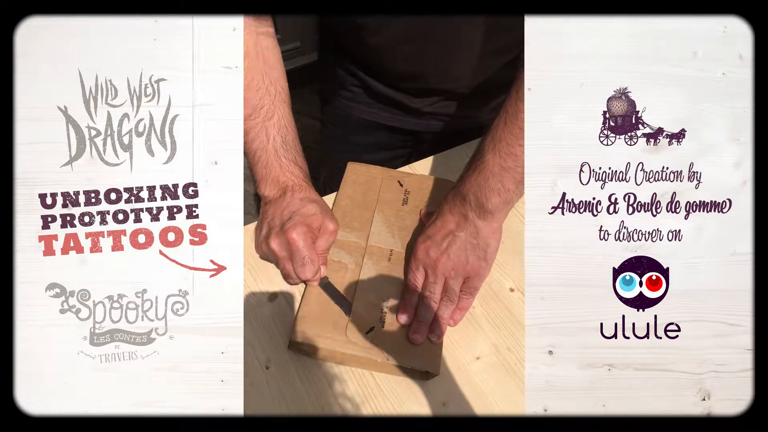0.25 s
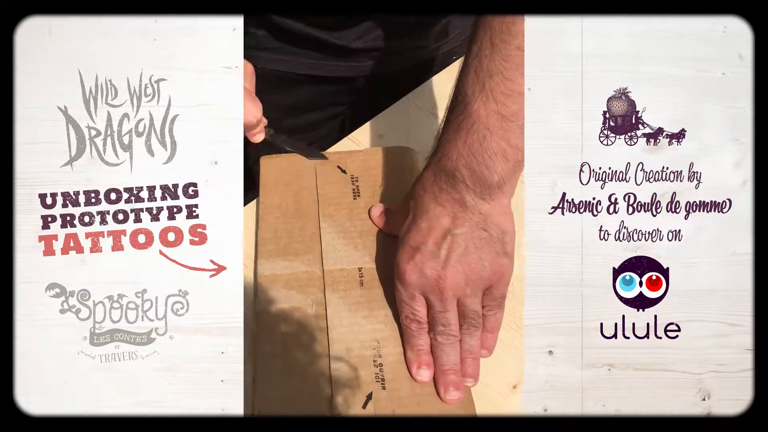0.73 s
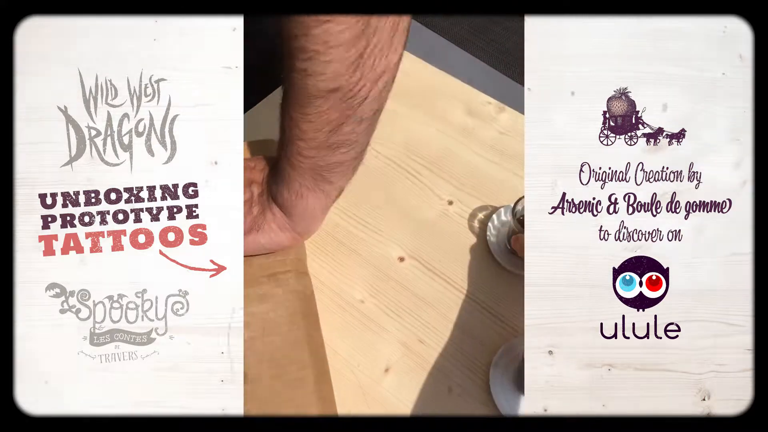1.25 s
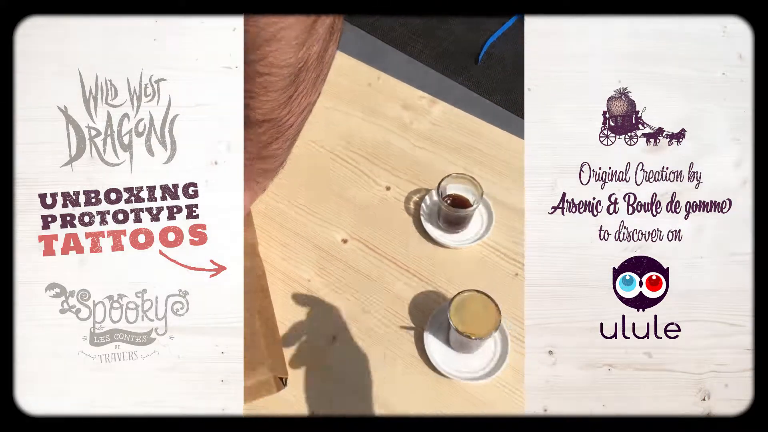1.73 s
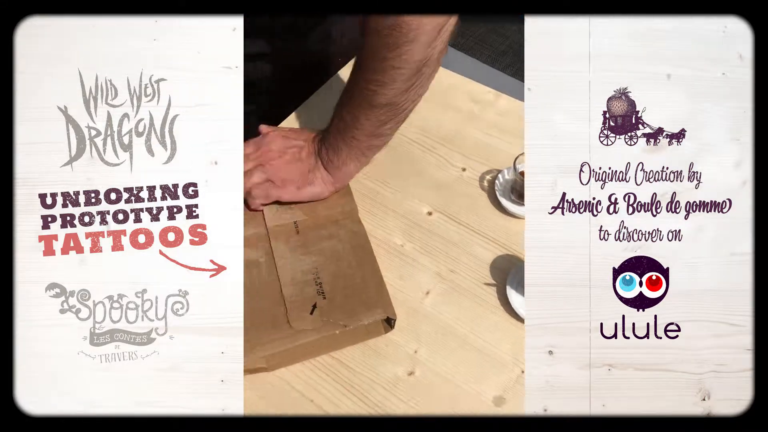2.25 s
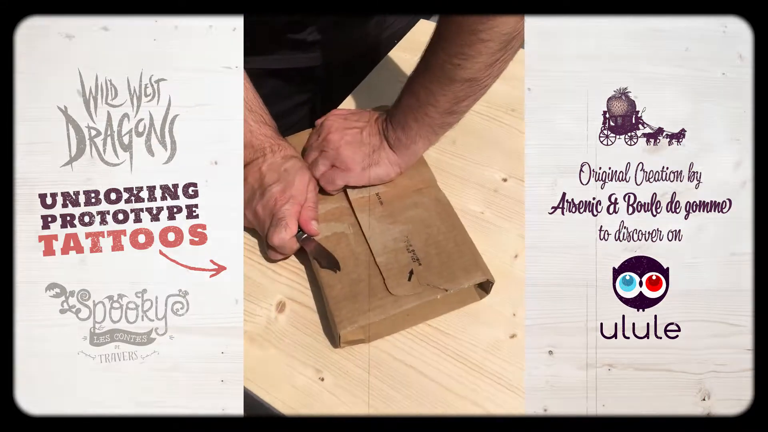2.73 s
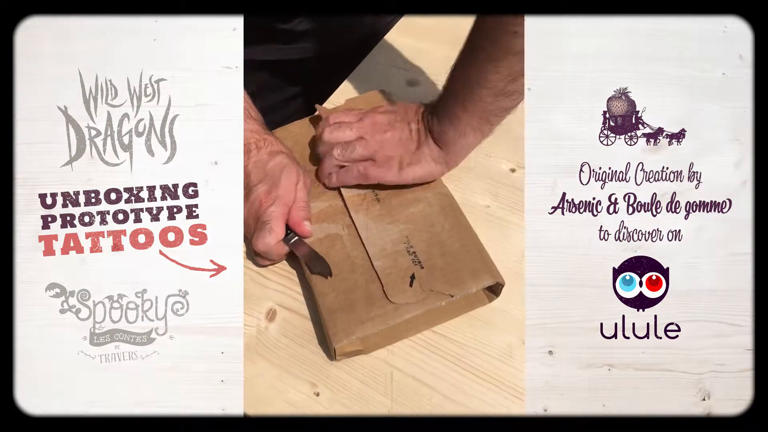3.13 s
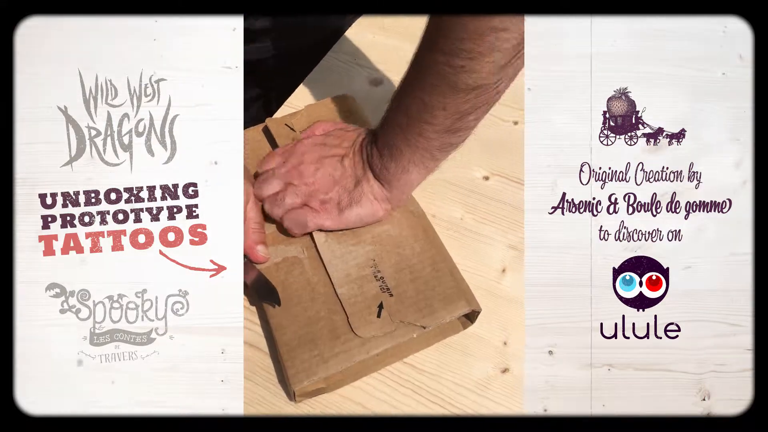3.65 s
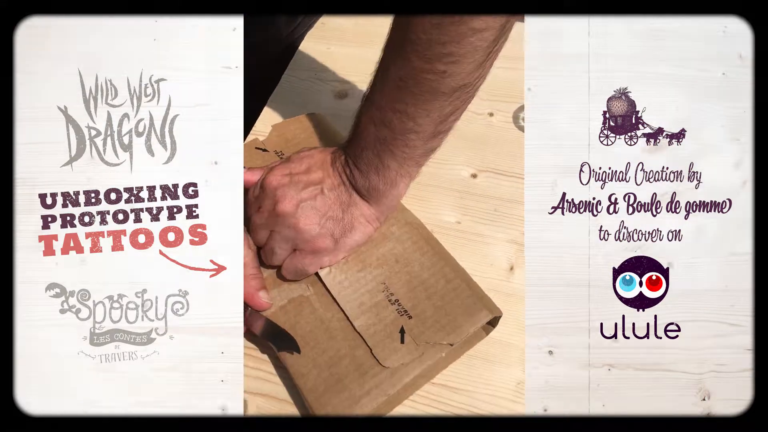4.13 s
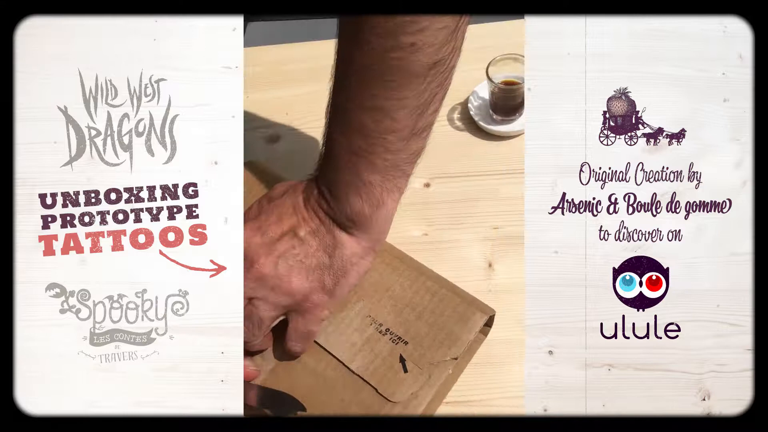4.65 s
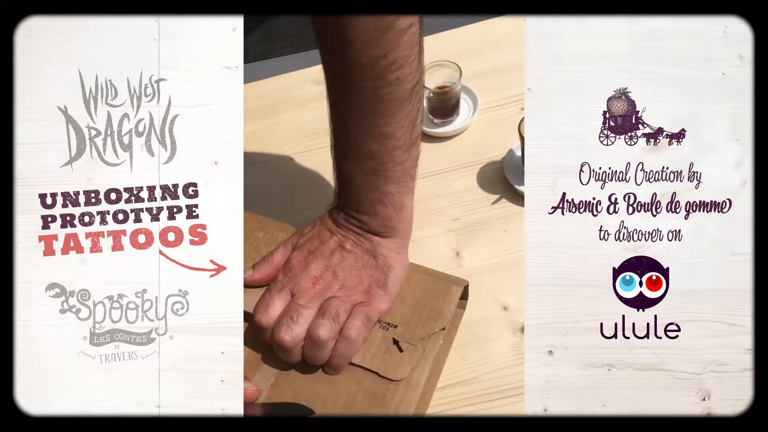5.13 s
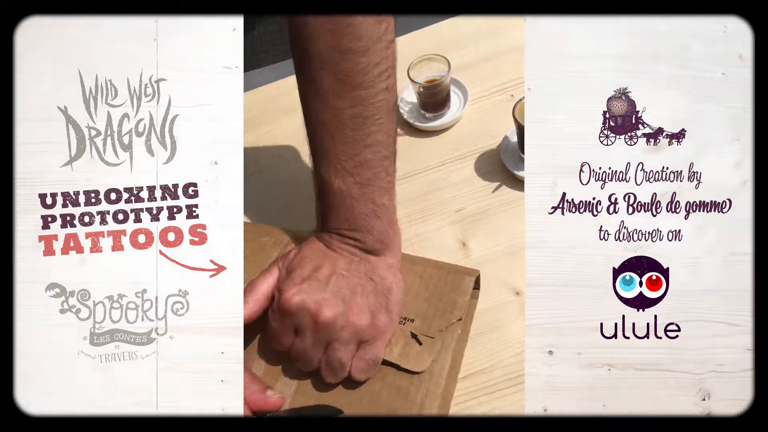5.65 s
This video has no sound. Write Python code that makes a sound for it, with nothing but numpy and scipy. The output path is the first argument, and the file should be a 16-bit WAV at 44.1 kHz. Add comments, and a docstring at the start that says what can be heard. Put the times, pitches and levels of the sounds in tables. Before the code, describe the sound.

Hands and a knife blade slide over a cardboard mailer on a wooden table, with soft papery strokes and faint ticks. The knife knocks down once with a brief metallic clink. Quiet rubbing follows, then hard snaps near three and four seconds, and a dense ripping crackle at the end. Close microphone, small dull reflections, low quiet room hum.

```python
"""Tearing open a cardboard mailer

Hands work a knife under the flap of a cardboard mailer on a wooden table and tear it open.
Palms and blade slide on the card: coloured friction noise. Fibres and glue snap: dying sprays of noise
through resonances. The packet bumps the table and the knife is dropped once: decaying sines.
Some scrapes sound hollow, the hits return a short dull wash, and a quiet room hums below."""
import sys
import numpy as np
from scipy import signal
from scipy.io import wavfile
from scipy.ndimage import uniform_filter1d

SR = 44100
rng = np.random.default_rng(int(sys.argv[2]) if len(sys.argv) > 2 else 0)


def put_to_file(sound):
    """Save the sound as 16-bit audio at rate SR, in the file named by the first command-line argument."""
    columns = np.atleast_2d(sound).T  # one column per channel
    safe = np.clip(columns, -1, 1)
    whole_steps = np.round(safe * 32767)
    wavfile.write(sys.argv[1], SR, whole_steps.astype(np.int16))


N = 259440

# Spectrum of the room: (frequency [Hz], relative level per Hz [dB])
ROOM_SPECTRUM = [(20, -35), (42, -0.5), (80, 0.5), (130, -5), (250, -9.5), (500, -17.5), (1100, -18.5),
                 (3500, -23.5), (12800, -30), (16500, -46)]
# Palms and blade rubbing the card, one row a stroke: (loudest moment [s], swell [ms], fade [ms],
# drop at both ends [dB], hiss [dB], extra sheen of the hiss [dB], drumming of the sheet [dB])
RUBBING_STROKES = [(0.089, 72, 133, -7, -52, -1.5, -56), (0.32, 76, 187, -6, -40.5, -1, -50),
                   (0.565, 25, 14.5, -5, -47.5, 7, -53), (0.609, 24.3, 36.4, -6.5, -44, 4, -52),
                   (0.701, 26.7, 21, -7, -47, 3, -56.5), (0.798, 76, 58, -6, -46.5, 1.5, -50.5),
                   (0.955, 53, 28, -12, -44, -4, -48.5), (1.022, 16, 12, -6, -50, -8, -68),
                   (1.171, 10, 48, -18, -41, -6, -46.5), (1.27, 39, 40, -4.5, -60, -0.5, -66),
                   (1.431, 96, 53, -6.5, -46, 0, -54), (1.548, 35, 38, -4, -55, -0.5, -53.5),
                   (1.615, 15, 28, -3, -57, 0, -55), (1.765, 125, 139, -8, -48, -2.5, -46),
                   (1.95, 65, 60, -5, -54.5, -0.5, -53), (2.079, 102, 160, -10, -45.5, -3, -48),
                   (2.34, 58, 193, -6, -49, 3, -50.5), (2.70, 190, 119, -7, -45.5, -0.5, -51),
                   (2.876, 52, 68, -6, -45.5, 0.5, -51), (2.989, 39.7, 78, -4.5, -52, -5, -53),
                   (3.12, 36, 69, -5, -41.5, 0, -51.5), (3.207, 20.8, 26, -10, -36, 4.5, -35),
                   (3.253, 18, 58, -11, -38.5, -1, -45), (3.36, 40, 32, -3.5, -61, 2, -60),
                   (3.453, 40.4, 51, -8.5, -43, -0.5, -49.5), (3.54, 30, 25, -4, -46, 3, -45),
                   (3.572, 12, 45, -10, -44, 2, -40), (3.70, 62, 94, -5.5, -43.5, 1, -45.5),
                   (3.85, 41, 48, -3.5, -49, 0, -58), (3.95, 51, 98, -3, -50, -1, -50.5),
                   (4.072, 12.7, 35.7, -10, -25, -7, -27.5), (4.118, 30, 32, -6, -31, -1.5, -39),
                   (4.189, 28.7, 83, -4.5, -57.5, -10, -55), (4.35, 47, 55, -6.5, -49, -1, -53.5),
                   (4.43, 36, 71, -5, -55.5, -0.5, -56), (4.53, 25.3, 90, -6.5, -52, -1, -53),
                   (4.629, 16.4, 57, -13.5, -40, -4, -42.5), (4.759, 34.5, 50, -5, -45, -3.5, -54),
                   (4.90, 79, 75, -6, -43, 3, -52), (5.13, 39, 90, -4.5, -48.5, 2, -48.5),
                   (5.248, 45, 25, -14, -36, -9, -32), (5.328, 18, 33, -7, -47, 8, -37),
                   (5.29, 21.3, 19.7, -3, -47, 4, -41), (5.499, 136, 62.5, -6, -37, -3, -46.5),
                   (5.599, 46, 53.4, -8.5, -27.5, 0, -33), (5.719, 67, 122, -4.5, -38, 1, -41.5),
                   (5.859, 23.5, 36, -4.5, -34, -6, -40.5)]
# Spectrum of the friction hiss: (frequency [Hz], relative level per Hz [dB])
HISS_SPECTRUM = [(1900, -45), (3100, -4), (4780, -4.5), (5840, 3), (7770, -2), (8620, 0), (14900, 7),
                 (16100, 6.5), (16500, -45)]
# Spectrum of the rumble under the drumming: (frequency [Hz], relative level per Hz [dB])
RUMBLE_SPECTRUM = [(59, -52), (100, -14), (291, 2), (501, -10), (590, -10), (700, -5.5), (910, -44),
                   (1540, -120)]
# Broad modes of the cardboard: (frequency [Hz], width [Hz], level [dB])
SHEET_MODES = [(887, 250, 0), (1305, 335, 2.5), (1550, 380, 4), (2380, 950, -5.5), (2693, 150, 6),
               (3110, 4000, -3.5)]
# Fibres and glue letting go:
# (time [s], crack peak [dB], crack pitch [Hz], sheet knock [dB], bright spit [dB])
FIBRE_SNAPS = [(0.082,-35.5,2050,-46,-46), (0.146,-38,1790,-57,-54), (0.1625,-32,2028,-53,-52),
               (0.175,-27.5,2580,-42,-41), (0.5404,-38,1530,-45,-39), (0.558,-30,4530,-58,-35),
               (0.565,-31,4600,-57,-26), (0.586,-39,6900,-44,-30), (0.6297,-43,5980,-59,-46),
               (0.6874,-47,1570,-59,-49), (0.73,-40,1503,-50,-41), (0.834,-36,1786,-43,-50),
               (0.8917,-35,2280,-45,-44), (0.9304,-36,1576,-42,-52), (0.9622,-26,1970,-32.5,-27),
               (0.9655,-23,6300,-32,-26), (1.0144,-54,1800,-46,-41), (1.0226,-40,1816,-42,-38),
               (1.1612,-14,2217,-19,-37), (1.4288,-41,1506,-35,-36), (1.6098,-48,1730,-37.5,-56),
               (1.905,-13.5,7400,-56,-26.5), (1.9107,-33,2650,-53,-59), (1.9924,-33,1948,-46,-50),
               (2.0317,-31,1825,-48.5,-49), (2.052,-30,3660,-45,-51), (2.0857,-27.5,4745,-49,-52),
               (2.1018,-23,2018,-40,-40), (2.1107,-34,6920,-46,-46), (2.2815,-39,2063,-47,-58),
               (2.3129,-25.5,1750,-39,-40), (2.3537,-23.5,1838,-47,-47), (2.7679,-30.5,1654,-44,-44),
               (2.8504,-31,3430,-62,-40), (2.9743,-35,1593,-55,-53), (3.1645,-5.5,5000,-35,-27),
               (3.1963,-1.5,2172,-17.5,-14), (3.2053,-11,2898,-35,-15), (3.2388,-5,3044,-25,-18.5),
               (3.2458,-23,1825,-31,-37), (3.2585,-23,3060,-22.5,-26), (3.5512,-24,2280,-43,-29),
               (3.5646,-22.5,2190,-37,-40), (3.5722,-19,2195,-30,-35), (3.7466,-29,2444,-49,-35),
               (3.8423,-30,5408,-55,-44), (3.9796,-27.5,3412,-57,-39), (4.0396,-35,1506,-29.5,-46),
               (4.0542,-10,2245,-31,-15), (4.063,-13,2488,-18,-19), (4.066,-2.5,2540,-11,-17),
               (4.0729,-7,2730,-12,-16), (4.0784,-26,1640,-27,-25), (4.0949,-9.5,6116,-28,-23),
               (4.1015,-17,2750,-26,-28), (4.1111,-11,6080,-24,-19), (4.1135,-13,2985,-32,-25),
               (4.1237,-17,5690,-30,-22), (4.1432,-18.5,6900,-46,-35), (4.1485,-15,6474,-42,-31),
               (4.5036,-13,2395,-31.5,-23), (4.5398,-45.5,1658,-56,-41.5), (4.5682,-30,6336,-52,-37),
               (4.6154,-17,6006,-41.5,-25), (4.6202,-5.5,2980,-36,-16.5), (4.6469,-10,2565,-25.5,-24),
               (4.7733,-28,1525,-42,-32), (5.2352,-38,2093,-39,-34), (5.242,-24,2266,-20,-26),
               (5.2491,-15,2420,-22,-22), (5.4162,-34,2171,-37,-39), (5.4307,-25,2660,-40,-35),
               (5.446,-13,2734,-32.5,-18), (5.4791,-26.5,3333,-49,-37), (5.5219,-24,6100,-46,-44),
               (5.5284,-20.5,3670,-43,-28), (5.5505,-18,6170,-40,-22), (5.5558,-10.5,3590,-34,-22),
               (5.5665,-10,3376,-20,-11), (5.5735,-10.5,3110,-30,-26), (5.583,-15,2874,-22,-27),
               (5.5851,-14,2835,-37,-17), (5.5917,-7,3142,-31,-16.5), (5.6122,-27,2232,-28,-26),
               (5.6165,-19,3370,-21,-14.5), (5.6288,-13.5,3000,-23,-14.5), (5.6333,-21.5,1960,-19,-31.5),
               (5.642,-34,2388,-30,-27), (5.6504,-35,2494,-41,-25.5), (5.669,-15,4585,-33,-18),
               (5.6782,-23,3893,-26,-19), (5.6973,-21,4590,-40,-25), (5.7053,-18,4573,-43,-30),
               (5.7172,-21,3787,-38,-31), (5.7342,-16,2154,-28.5,-24), (5.7566,-17.5,2857,-34,-25),
               (5.7715,-18,2810,-35,-21), (5.796,-18,1611,-22,-32), (5.8075,-21,2140,-27,-24),
               (5.8184,-21,2097,-28,-33), (5.827,-20,2132,-23,-33), (5.8526,-9,2580,-15.5,-21),
               (5.8646,-17,3490,-25,-16.5)]
# Spectrum of the bright spit of a snap: (frequency [Hz], relative level per Hz [dB])
SPIT_SPECTRUM = [(3530, -15.5), (6000, -3), (10400, -5), (11500, -1), (14800, -5.5), (16000, -8),
                 (16500, -31)]
# Hollow scrapes, when a rubbed flap sounds one broad note:
# (start [s], length [s], pitch [Hz], level [dB])
HOLLOW_SCRAPES = [(0.274, 0.14, 1590, -55), (3.509, 0.074, 2397, -42), (5.216, 0.056, 2450, -34.5),
                  (5.261, 0.086, 2196, -38.5), (5.461, 0.21, 1170, -45), (5.659, 0.085, 1150, -39)]
# Packet and hands bumping the table: (time [s], level [dB], pitch [Hz])
TABLE_BUMPS = [(0.548, -44, 154.8), (0.586, -35, 154), (0.773, -38, 143), (0.899, -37, 295),
               (0.961, -25.5, 310), (1.16, -25.5, 342), (1.165, -29, 147), (1.19, -34, 376),
               (1.205, -32.5, 215), (1.43, -16.5, 237.4), (1.544, -43, 296), (1.895, -36, 322.5),
               (2.022, -32.5, 324), (2.169, -35.5, 197.4), (2.306, -34.5, 106.7), (2.37, -39, 87.2),
               (2.959, -40, 62), (3.195, -19.5, 318), (3.234, -26, 272), (3.259, -21.5, 240),
               (3.65, -39, 199.6), (3.913, -37, 182.3), (4.065, -12.5, 372), (4.109, -29, 374),
               (4.502, -26, 245), (4.623, -27, 193.5), (4.654, -29, 85.2), (4.774, -30.5, 158.5),
               (4.798, -26.5, 141.2), (5.241, -21, 304), (5.563, -26.5, 257), (5.599, -30, 319.2),
               (5.725, -46.5, 258.6), (5.852, -15, 328)]
# The knife landing and bouncing: (time [s], level [dB])
KNIFE_LANDINGS = [(1.1615, -10.5), (1.169, -21)]
# Modes of the table top, then the blade: (frequency [Hz], level [dB], t60 [s])
KNIFE_MODES = [(1124, -3.5, 0.016), (2140, -2.5, 0.013), (5277, -3, 0.07), (9230, -11, 0.056),
               (9500, -5.5, 0.055), (11740, -27, 0.15), (13600, -29, .04), (15930, -14, .06)]

ROOM_DB = -57
RESTING_HISS_DB, RESTING_DRUM_DB = -74, -78  # hands shifting between strokes
ROUNDNESS = 1.3  # power of time by which a stroke's level drops
LIFT_DB_PER_MS = 1  # steeper fall once contact is lost
CRACKLE_SHARE = 0.25  # share of the friction power that is fibre clicks
PATCHY_DB, PATCHES_PER_S = 2.26, 4.1
SHEEN_HZ = 8740  # the sheen lies above this
DRUM_TOP_HZ = 3830  # the rubbed sheet drums below this
RUMBLE_UNDER_DRUM_DB = -6.5
DYING_MS = 17.95  # t60 of a snap whose knock equals its crack or spit
DULL_LINGERS_MS_PER_DB = 0.31  # a snap with more knock than crack or spit dies slower
FIRST_BREAK_DB, FIRST_BREAK_S = 6.5, 0.0006  # the first fibres to go stand out of the spray
CRACK_Q, BROAD_CRACK_DB = 4.4, -9  # sharpness of the pitch; the unpitched part beside it
SMALL_SNAPS_PER_S, MID_RUB_DB = 36, -46  # the rate holds at this hiss level
HARD_RUB_QUICKENS = 0.8  # dB of rate per dB of hiss
SMALL_SNAP_OVER_RUB_DB, SMALL_SNAP_SPREAD_DB = 1.5, 4.0
SMALL_CRACK_LOW_HZ, SMALL_CRACK_HIGH_HZ = 1810, 6800
SCRAPE_WIDTH_HZ = 370
BUMP_RING_S, BUMP_RING_CYCLES = 0.025, 6.0  # t60 = a fixed time plus some cycles
ECHO_DB, ECHO_T60_S = -18.5, 0.055
CUTOFF_HZ = 15800


def from_db(db):
    """Decibel law: 20 dB is a factor of ten in amplitude."""
    return 10 ** (np.asarray(db) / 20)


def rms_one(x):
    """Normalization to unit root-mean-square amplitude."""
    return x / np.sqrt(np.mean(x ** 2) + 1e-20)


def drift(rate_hz):
    """Low-passed random fluctuation: white noise through a double pole, with spread 1."""
    r = np.exp(-80 * np.pi * rate_hz / SR)  # one step spans 40 samples
    noise = rng.standard_normal(N // 40 + 2002)
    slow = signal.lfilter([1], [1, -2 * r, r * r], noise)[2000:]
    return np.interp(np.arange(N) / 40, np.arange(len(slow)), rms_one(slow))


def colour(x, spectrum):
    """Spectral shaping by a causal (minimum-phase) filter that follows a spectrum."""
    hz, level_db = np.transpose(spectrum)
    grid = np.linspace(0, SR / 2, 4097)
    shape_db = np.interp(np.log(grid + 1), np.log(hz), level_db, left=-45, right=-45)
    # the minimum-phase step takes the square root, so it is given power
    power_taps = signal.firwin2(4097, grid, from_db(2 * shape_db), fs=SR)
    taps = signal.minimum_phase(power_taps, n_fft=2 ** 15)
    taps = taps.reshape((1,) * (x.ndim - 1) + (-1,))
    return signal.fftconvolve(x, taps, axes=-1)[..., :x.shape[-1]]


def band(x, low_hz, high_hz):
    """Band limitation by a Butterworth filter."""
    return signal.sosfilt(signal.butter(2, [low_hz, high_hz], "band", fs=SR, output="sos"), x)


def resonance(x, hz, width_hz):
    """Simple resonance: a two-pole band-pass with gain 1 on top."""
    r = np.exp(-np.pi * width_hz / SR)
    zeros = (1 - r * r) / 2 * np.array([1, 0, -1])
    poles = [1, -2 * r * np.cos(2 * np.pi * hz / SR), r * r]
    return signal.lfilter(zeros, poles, x)


def sheet(x):
    """Modal superposition: the broad modes of the cardboard, in parallel with alternating signs."""
    return sum((-1) ** k * from_db(level_db) * resonance(x, hz, width_hz)
               for k, (hz, width_hz, level_db) in enumerate(SHEET_MODES))


def add(track, times, sounds):
    """Linear superposition: each row of sounds is laid on the track at its time."""
    for s, sound in zip(times, sounds):
        i = round(s * SR)
        track[i:i + len(sound)] += sound[:N - i]


def room_hum():
    """Stationary ambient noise: a coloured hum whose level wavers slightly."""
    hum = rms_one(colour(rng.standard_normal(2 * N), ROOM_SPECTRUM)[N:])  # past the filter's onset
    return from_db(ROOM_DB + 0.28 * drift(1.6)) * hum


def rubbing():
    """Contact envelopes in dB (hiss, sheen, drum): each stroke swells, fades and lets go; powers add."""
    t = np.arange(0, N, 32) / SR
    columns = (c[:, None] for c in np.transpose(RUBBING_STROKES))
    s, swell_ms, fade_ms, drop_db, hiss_db, sheen_db, drum_db = columns
    away_ms = np.abs(t - s) * 1000
    reach_ms = np.maximum(np.where(t < s, swell_ms, fade_ms), 5)
    shape_db = drop_db * np.minimum(away_ms / reach_ms, 1) ** ROUNDNESS
    shape_db = shape_db - LIFT_DB_PER_MS * np.maximum(away_ms - reach_ms, 0)
    levels = []
    for peak_db, rest_db in ((hiss_db, RESTING_HISS_DB), (hiss_db + sheen_db, RESTING_HISS_DB),
                             (drum_db, RESTING_DRUM_DB)):
        power = from_db(2 * rest_db) + np.sum(from_db(2 * (peak_db + shape_db)), axis=0)
        levels.append(np.interp(np.arange(N) / SR, t, 10 * np.log10(power)))
    return levels


def patchy(x):
    """Independent band modulation: bands about two fifths of an octave apart in edges swell and sink."""
    edges = np.geomspace(400, 19000, 15)
    return sum((-1) ** k * from_db(PATCHY_DB * drift(PATCHES_PER_S)) * band(x, low, high)
               for k, (low, high) in enumerate(zip(edges, edges[1:])))


def fibre_crackle():
    """Clustered shot noise: tiny random fibre clicks, each a short decaying grain of noise."""
    born = rng.random(N) < 700 * from_db(5 * drift(25)) / SR  # clicks come in clumps
    sizes = from_db(1.6 * np.minimum(rng.exponential(1, N), 4))
    clicks = born * sizes * rng.choice([-1, 1], N)
    grain = rng.standard_normal(64) * np.exp(-np.arange(64) / 24.0)
    return rms_one(signal.fftconvolve(clicks, grain)[:N])


def slide(hiss_db, sheen_db, drum_db):
    """Friction excitation: noise mixed with fibre clicks feeds air and sheet; noise rumbles the table."""
    grip = from_db(1.12 * drift(38))  # skin grips and slips
    smooth = np.sqrt(1 - CRACKLE_SHARE) * rng.standard_normal(N)
    friction = grip * patchy(smooth + np.sqrt(CRACKLE_SHARE) * fibre_crackle())
    air = rms_one(colour(friction, HISS_SPECTRUM))
    below = signal.sosfilt(signal.butter(4, SHEEN_HZ, "low", fs=SR, output="sos"), air)
    above = signal.sosfilt(signal.butter(4, SHEEN_HZ, "high", fs=SR, output="sos"), air)
    hiss = from_db(hiss_db) * below + from_db(sheen_db) * above
    drumming = band(band(sheet(friction), 300, DRUM_TOP_HZ), 300, DRUM_TOP_HZ)
    drum = from_db(drum_db) * rms_one(drumming)
    rumble_db = drum_db + RUMBLE_UNDER_DRUM_DB + 3.56 * drift(29)
    rumble = from_db(rumble_db) * rms_one(colour(rng.standard_normal(N), RUMBLE_SPECTRUM))
    return hiss + drum + rumble


def snaps(rows):
    """Impulsive fracture: a dying spray of breaking fibres, heard as crack, sheet knock and bright spit."""
    s, crack_db, crack_hz, knock_db, spit_db = np.transpose(rows)
    dying_ms = DYING_MS + DULL_LINGERS_MS_PER_DB * (knock_db - np.maximum(crack_db, spit_db))
    t60 = np.clip(dying_ms, 3, 60)[:, None] / 1000
    t = np.arange(2048) / SR
    onset = (1 - np.exp(-t / 0.00023)) * from_db(FIRST_BREAK_DB * np.exp(-t / FIRST_BREAK_S))
    spray = rng.standard_normal((len(s), 2048)) * onset * from_db(-60 * t / t60)
    pitched = np.array([resonance(row, hz, hz / CRACK_Q) for row, hz in zip(spray, crack_hz)])
    crack = pitched + from_db(BROAD_CRACK_DB) * band(spray, 1620, 7120)
    knock = band(sheet(spray), 380, 1670)
    spit = colour(spray, SPIT_SPECTRUM)
    out = np.zeros(N)
    add(out, s, crack * (from_db(crack_db) / np.abs(crack).max(axis=1))[:, None])
    for sound, level_db in ((knock, knock_db), (spit, spit_db)):
        strongest = np.sqrt(uniform_filter1d(sound ** 2, size=44).max(axis=1))  # loudest ms
        add(out, s, sound * (from_db(level_db) / strongest)[:, None])
    return out


def small_snaps(hiss_db, drum_db):
    """Inhomogeneous Poisson process: rows of lesser snaps, denser and stronger in hard strokes."""
    rate = SMALL_SNAPS_PER_S * from_db(HARD_RUB_QUICKENS * (hiss_db - MID_RUB_DB))
    expected = np.cumsum(rate) / SR
    gaps, pitch = rng.exponential(1, 700), rng.random(700)
    spread = rng.standard_normal((700, 3))
    at = np.searchsorted(expected, np.cumsum(gaps))
    inside = at < N
    at, pitch, spread = at[inside], pitch[inside], spread[inside]
    under_db = np.array([hiss_db[at], drum_db[at], hiss_db[at]])  # the stroke beneath
    crack_db, knock_db, spit_db = SMALL_SNAP_OVER_RUB_DB + SMALL_SNAP_SPREAD_DB * spread.T + under_db
    hz = SMALL_CRACK_LOW_HZ * (SMALL_CRACK_HIGH_HZ / SMALL_CRACK_LOW_HZ) ** pitch
    return np.column_stack([at / SR, crack_db, hz, knock_db, spit_db])


def scrapes():
    """Noise-driven resonance: grit passes one resonance twice, swelling and fading as an arch."""
    out = np.zeros(N)
    t = np.arange(SR // 4) / SR
    for s, length_s, hz, level_db in HOLLOW_SCRAPES:
        grit = rng.standard_normal(SR // 4) * from_db(4.0 * drift(55)[:SR // 4])
        once = resonance(grit, hz, SCRAPE_WIDTH_HZ)
        note = rms_one(resonance(once, hz, SCRAPE_WIDTH_HZ))
        arch = np.sin(np.pi * np.clip(t / length_s, 0, 1))
        add(out, [s], [from_db(level_db) * arch * note])
    return out


def bumps():
    """Damped free vibration: a soft push rings a low table mode and a weaker, shorter upper one."""
    s, level_db, hz = (c[:, None] for c in np.transpose(TABLE_BUMPS))
    t, out = np.arange(6000) / SR, np.zeros(N)
    t60 = BUMP_RING_S + BUMP_RING_CYCLES / hz
    main = np.sin(2 * np.pi * hz * t) * from_db(-60 * t / t60)
    upper = from_db(-7) * np.sin(2 * np.pi * 1.49 * hz * t) * from_db(-90 * t / t60)
    push = 1 - np.exp(-t / 0.0023)
    add(out, s[:, 0], from_db(level_db) * push * (main + upper))
    return out


def knife():
    """Modal impact response: table top and blade ring when the knife lands and when it bounces."""
    s, level_db = np.transpose(KNIFE_LANDINGS)
    t, out = np.arange(12000) / SR, np.zeros(N)
    ringing = sum(from_db(mode_db - 60 * t / t60) * np.sin(2 * np.pi * hz * t)
                  for hz, mode_db, t60 in KNIFE_MODES)
    add(out, s, from_db(level_db)[:, None] * ringing * (1 - np.exp(-t / 0.00025)))
    return out


def echoes(x):
    """Diffuse reflection: nearby table top and walls return a short, dull wash of decaying noise."""
    t = np.arange(8000) / SR
    wash = rng.standard_normal(8000) * from_db(-60 * t / ECHO_T60_S) * (t > 0.003)
    wash = band(wash, 140, 7500)
    return from_db(ECHO_DB) * signal.fftconvolve(x, wash / np.sqrt(np.sum(wash ** 2)))[:N]


def scene():
    """Superposition: hits and their echoes over the rubbing, the scrapes and the room."""
    room = room_hum()
    hiss_db, sheen_db, drum_db = rubbing()
    rub = slide(hiss_db, sheen_db, drum_db)
    breaking = snaps(FIBRE_SNAPS) + snaps(small_snaps(hiss_db, drum_db))
    hits = breaking + bumps() + knife()
    return (hits + echoes(hits) + rub + scrapes() + room)[None]


def record(dry):
    """Saturation and band limitation: peaks are rounded, the top is cut."""
    rounded = 1.3 * np.tanh(dry / 1.3)
    return signal.sosfilt(signal.ellip(10, 0.5, 75, CUTOFF_HZ, fs=SR, output="sos"), rounded)


dry = scene()
out = record(dry)
put_to_file(out)
```